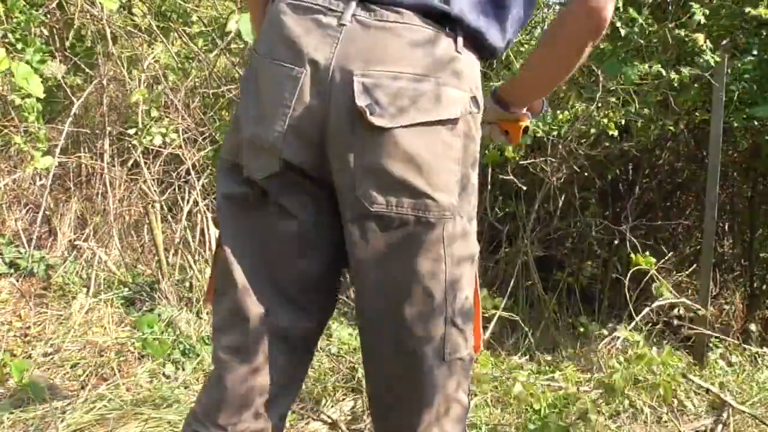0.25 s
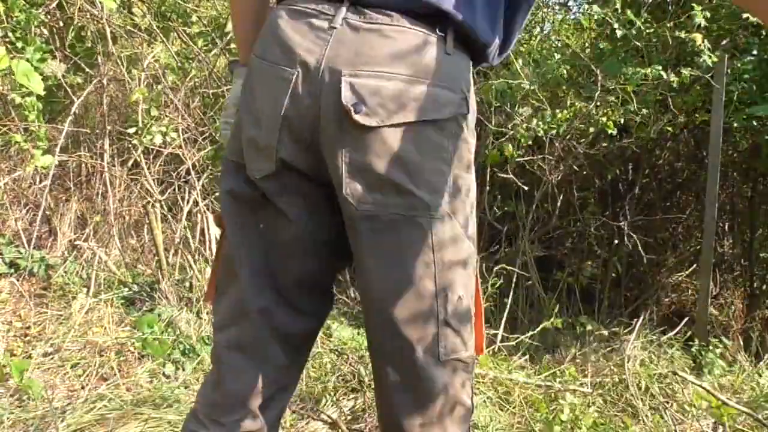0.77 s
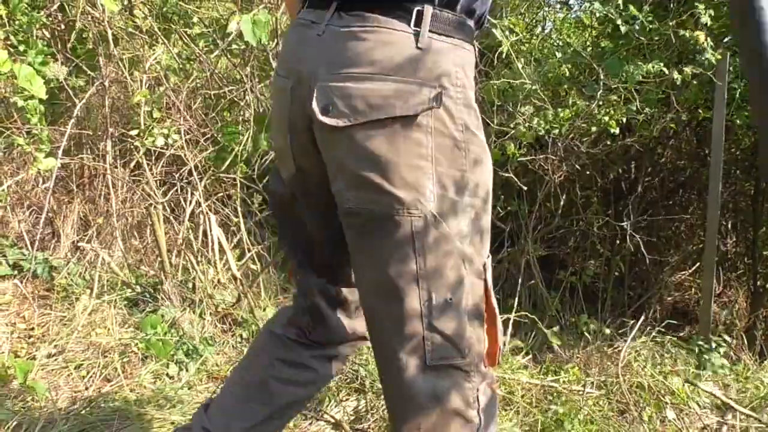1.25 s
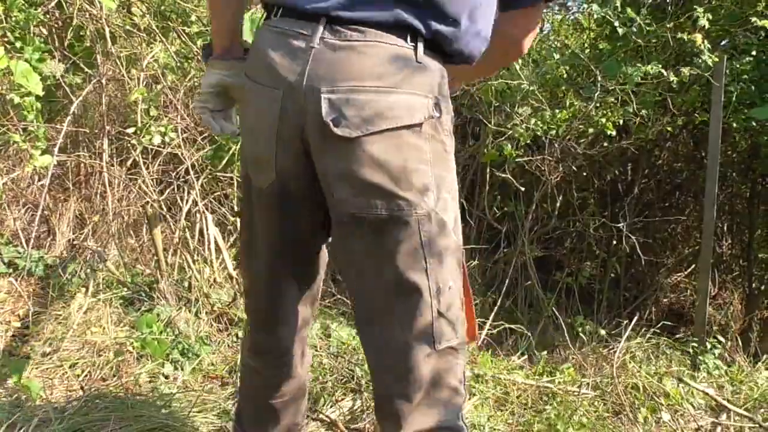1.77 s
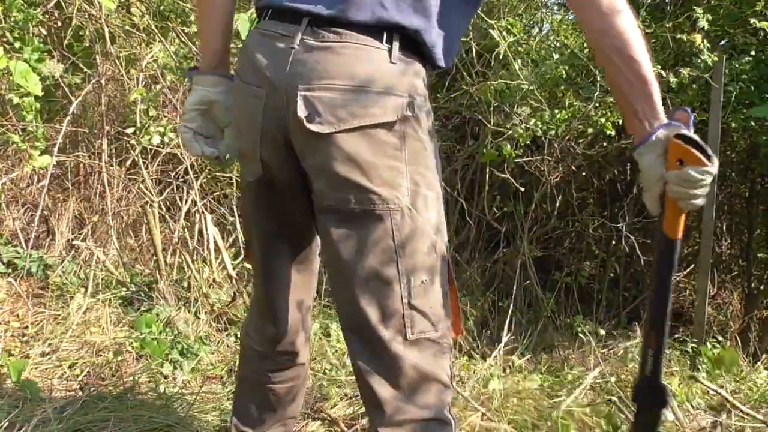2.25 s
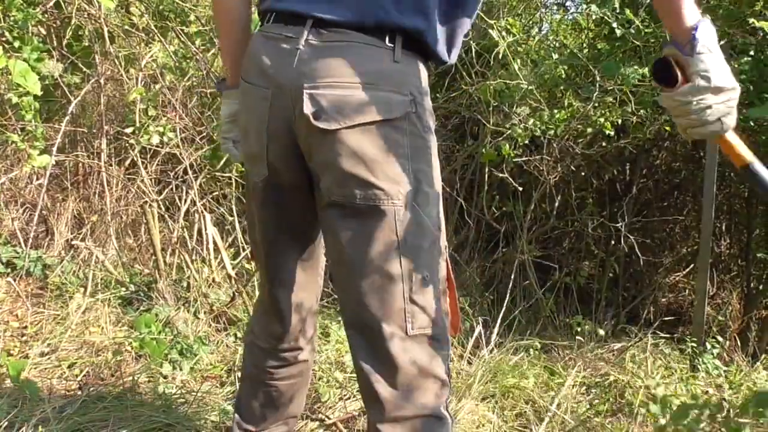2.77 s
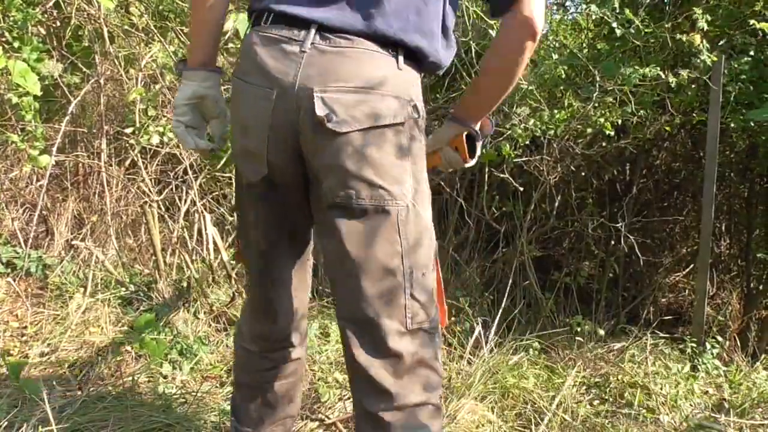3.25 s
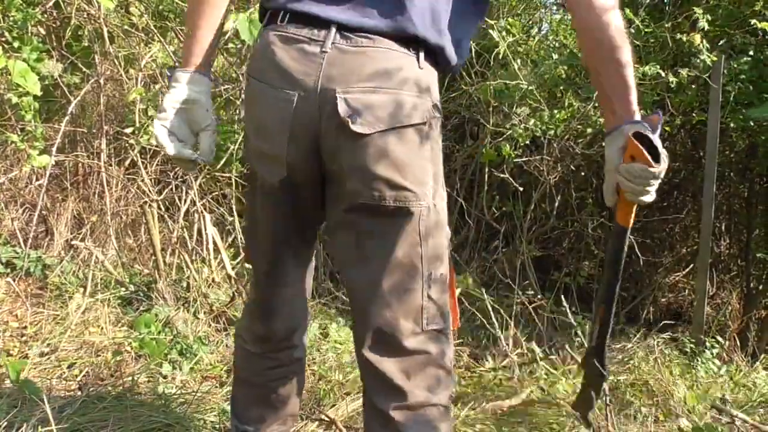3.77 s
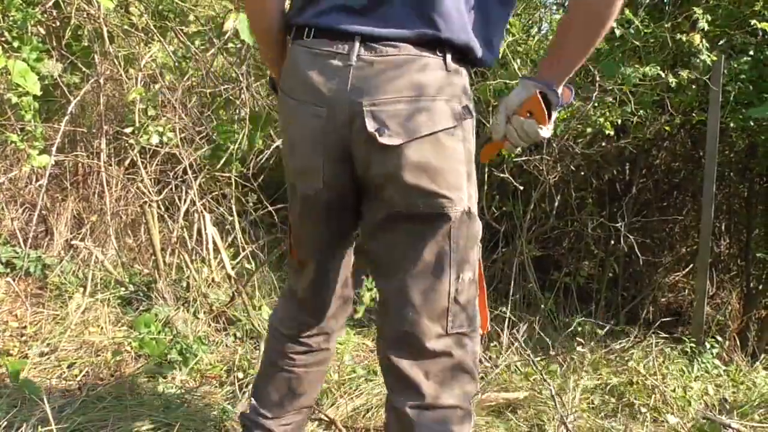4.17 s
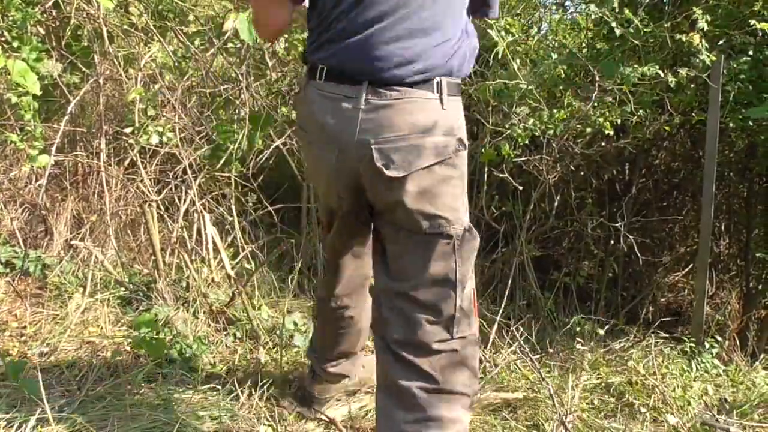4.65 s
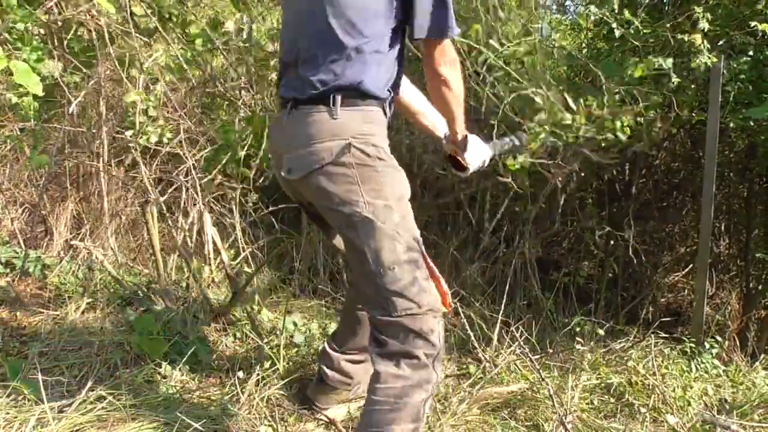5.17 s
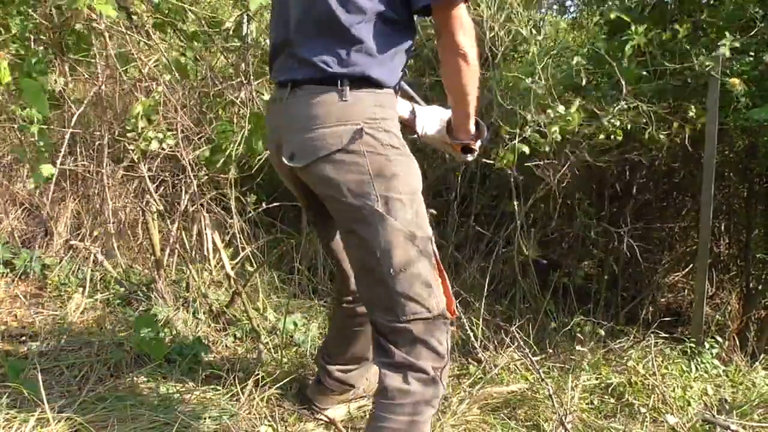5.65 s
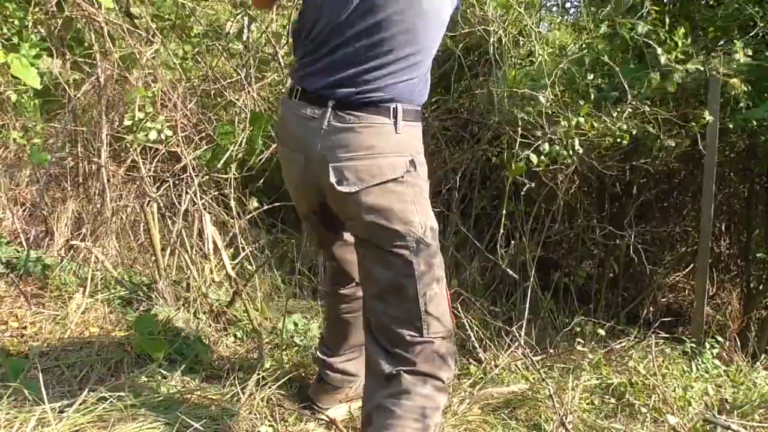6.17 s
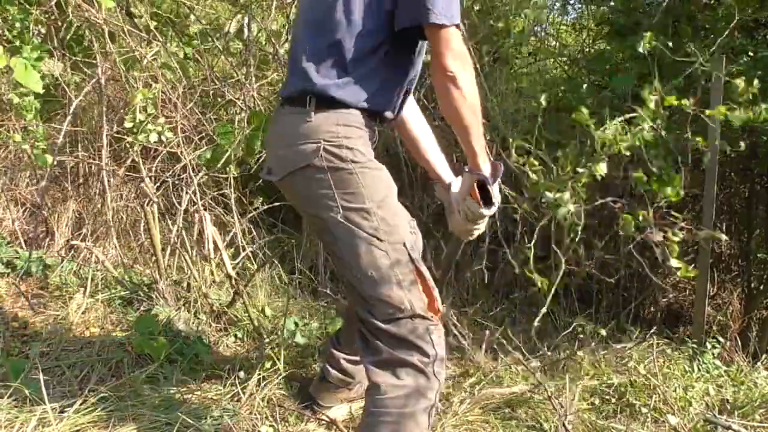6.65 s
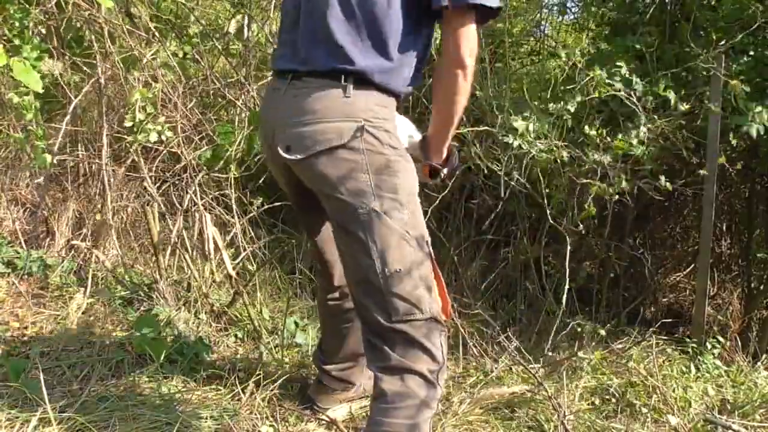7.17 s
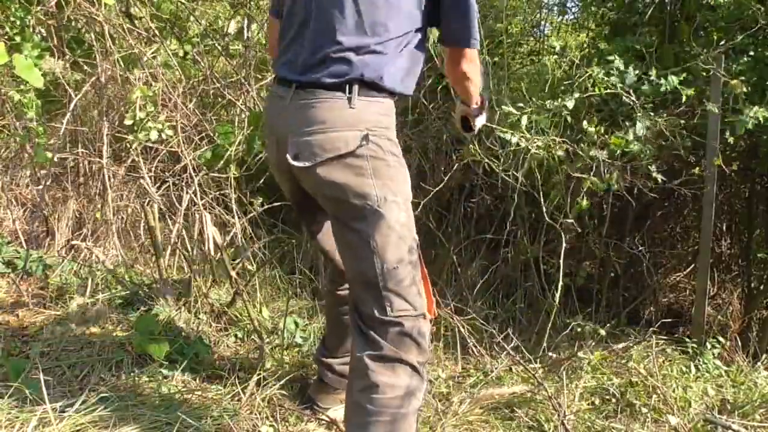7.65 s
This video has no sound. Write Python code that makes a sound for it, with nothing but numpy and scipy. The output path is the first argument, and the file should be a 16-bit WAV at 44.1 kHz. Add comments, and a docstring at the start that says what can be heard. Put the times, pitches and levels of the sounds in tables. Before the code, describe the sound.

Close outdoor stereo sound of bramble clearing. Soft dry stirring, then a crackling slash; straw crunches underfoot; two further slashes follow with longer, fizzing leaf rustle and bright ticks. More steps lead into a heavy fourth chop, then a pause, a loud snapping fifth stroke with low knocks, and a small final one. Thin foliage hiss and a barely audible far engine lie beneath, with only a short, diffuse hedge tail.

```python
"""Dry leaves and twigs stir close to the microphone, in quiet open air with a faint engine far off.
A man treads in dry grass and slashes at a bramble thicket with a long brush hook, six strokes in all.
Each stroke cracks stems and sets off a crunch that dies as the canes settle; boots crush straw between.
Crunch is dense random noise grains, stems ring and splinter, leaves tick, and knocks and drags are low
resonances; filtered noise makes the air, two wavering sines the engine, and a short tail the hedge."""
import sys
import numpy as np
from scipy import signal
from scipy.fft import rfft, irfft
from scipy.io import wavfile
from scipy.ndimage import uniform_filter1d

SR = 44100
rng = np.random.default_rng(int(sys.argv[2]) if len(sys.argv) > 2 else 0)


def store_wav(level_fs):
    """Save 16-bit WAV to argv[1]."""
    pcm = np.round(np.clip(np.atleast_2d(level_fs), -1, 1) * 32767)
    wavfile.write(sys.argv[1], SR, pcm.T.astype(np.int16))


N = 348698  # length in samples

# Strokes of the hook in the thicket. Each row: start in seconds, shaken leaves in dB, breaking twigs in dB,
# crushed litter in dB (all before the layer trims), time the blade cuts in seconds, fade in dB per second,
# swaying canes in dB relative to the stroke, time they sway in seconds.
HOOK_STROKES = [(0.696, -27.5, -37.5, -39.5, 0.068, 74, -18.5, 0.57),
                (2.209, -27.5, -33.5, -38.5, 0.24, 100, -5.5, 0.82),
                (3.641, -26.5, -33, -39.6, 0.12, 61.5, -13, 0.78),
                (5.139, -27.5, -30.3, -34.5, 0.18, 64.0, -7.5, 0.59),
                (6.57, -27.5, -34, -37.5, 0.047, 49.5, -13, 0.79),
                (7.788, -39.5, -43.5, -44.5, 0.14, 66, -13.0, 0.8)]
# How each layer answers a stroke. Each holds: rise in seconds, sag while the blade cuts in dB per second
# (negative swells), share in the sway in dB, level at rest in dB before the layer trim.
LEAF_RESPONSE = (.015, -2, 1, -67)
TWIG_RESPONSE = (.004, 19.5, -2.5, -79)
LITTER_RESPONSE = (0.03, 25.5, -2.1, -68.5)
SWAY_FADE_DB_PER_S, SETTLE_DB_PER_S = 15, 57
# Boots press into the straw or pull free of it. Each row: time of the height in seconds, rise in seconds,
# fall in seconds, leaves in dB, twigs in dB, litter in dB (before the layer trims).
BOOT_STEPS = [(1.195, 0.49, 0.396, -46.5, -54.5, -63), (1.274, 0.021, 0.085, -43, -50, -44.5),
              (1.411, 0.13, 0.27, -44, -53.5, -50.5), (1.55, 0.06, 0.19, -44, -51, -53.5),
              (1.722, 0.013, 0.12, -40, -54.0, -51), (1.767, 0.14, 0.16, -36.5, -48, -49),
              (4.704, 0.15, 0.309, -37.6, -49.0, -47.1), (4.831, 0.11, 0.064, -27.5, -44.5, -46.5),
              (5.004, 0.13, 0.222, -45, -59.4, -58), (5.128, 0.011, 0.085, -36.5, -41, -47)]
# A cane is caught, tugged or springs back. Each row: time of the height in seconds, rise in seconds,
# fall in seconds, leaves in dB, twigs in dB, litter in dB (before the layer trims).
CANE_SHAKES = [(0.012, 0.17, 0.39, -44.5, -54, -61), (0.131, 0.011, 0.15, -50, -53, -59.7),
               (0.416, 0.359, 0.33, -53, -64, -64), (0.76, 0.029, 0.056, -20, -28, -35.5),
               (0.856, 0.011, 0.022, -34, -34.5, -36.5), (0.898, 0.082, 0.27, -50, -41, -45),
               (0.974, 0.031, 0.023, -42, -41, -45), (2.02, 0.42, 0.16, -48.5, -59, -62.5),
               (2.252, 0.029, 0.033, -36, -28.8, -39), (2.49, 0.009, 0.018, -32, -49, -50.3),
               (2.621, 0.19, 0.24, -33, -41, -45), (3.044, 0.26, 0.32, -58, -52, -53),
               (3.317, 0.021, 0.159, -53.5, -74, -57.5), (4.491, 0.47, 0.033, -46, -59, -63),
               (5.085, 0.091, 0.183, -41.5, -55.3, -55), (6.022, 0.71, 0.54, -49.5, -57, -60.5),
               (6.205, 0.079, 0.29, -47, -56.5, -58.5), (6.301, 0.025, 0.4, -45.5, -55.5, -61.5),
               (6.481, 0.025, 0.124, -48, -54, -55), (6.554, 0.077, 0.031, -44, -50, -56.0),
               (6.596, 0.022, 0.061, -20.5, -31, -31.5), (6.728, 0.11, 0.089, -25.5, -35.5, -39.8),
               (7.48, 0.15, 0.097, -51, -64, -72.2), (7.561, 0.0071, 0.046, -49, -53.7, -54.5),
               (7.872, 0.088, 0.13, -30.5, -37.5, -44)]
SWELL_DB = 20  # a step or shake climbs this far in its rise time and drops as far in its fall time

# Colours of the three kinds of grain. Each row: frequency in Hz, relative density in dB per Hz.
LEAF_COLOUR = [(3000, -34), (5500, -15.5), (6300, -10), (7200, -3.5), (8400, 0), (9200, 0.5), (10800, -4),
               (13000, -6), (15000, -12), (16000, -20)]
TWIG_COLOUR = [(700, -30.5), (1300, -1), (1750, -7.5), (2150, -2), (2700, -7), (3300, -2), (4100, -3),
               (5600, -5.5), (6800, -2.5), (8800, -3), (15000, -88)]
LITTER_COLOUR = [(25, -56), (50, -37), (75, -8.5), (140, -3.5), (250, 0), (380, 1.5), (600, 0), (900, 1),
                 (1250, -3.5), (1700, -12.5), (2300, -29), (4000, -76.5)]
# Sheen at the top of the leaves. Each row: time in seconds, gain of the top treble in dB.
TOP_TREBLE_GAIN = [(0, -1), (1.1, -2.5), (2.2, 0.5), (2.9, -1), (3.4, 1), (3.8, 0.5), (4.3, 0), (4.75, 3.5),
                   (5.3, 1), (6.1, 3), (7.2, -1), (7.85, 3.5)]
TOP_TREBLE_HZ = 10800

# Colour of the still air around the microphone. Each row: frequency in Hz, relative density in dB per Hz.
AIR_COLOUR = [(15, -32), (25, -38), (55, -8), (145, -3.5), (185, -7.5), (217, -7), (344, -6.5),
              (416, -14.5), (463, -11), (887, -10), (1040, -12), (1790, -23.5), (5570, -30), (8590, -17),
              (16000, -27)]
# Likeness of left and right in the air. Each row: frequency in Hz, shared part of the power from 0 to 1.
AIR_LIKENESS = [(60, 0.66), (1000, 0.01), (3000, 0.33), (8000, 0.4), (15000, 0)]
AIR_DB = -56
# The far engine, slowly sagging. Each row: time in seconds, mean firing rate in Hz,
# mean level of the fundamental in dB, mean level of the octave in dB.
FAR_ENGINE = [(0, 86.1, -80, -82), (2, 85.3, -69.5, -80.5), (4, 80.9, -67, -72), (5.5, 80.4, -69.5, -64.5),
              (7.9, 80.05, -67, -64.5)]

# Stems that break under blade or boot. Each row: start in seconds, level in dB before the layer trim,
# pitch in Hz, ring in cycles, splinters in dB relative to the ring.
STEM_SNAPS = [(0.1247, -24, 1290, 0.96, -12), (0.133, -25, 4850, 3.4, -25), (.6997, -23, 1320, 2.6, -9),
              (.7025, -17.5, 2200, 1.4, -8), (.7628, -19, 4200, 1.4, -5), (0.8958, -24.5, 1200, 2, -22),
              (1.269, -9.5, 7100, 2, -14), (1.2715, -24, 2870, 2.4, -20), (1.415, -35, 2380, 2.6, -11),
              (1.535, -35, 5170, 5, -7), (1.574, -34, 3300, 2, -5.5), (1.59, -36, 3800, 2, -7),
              (2.2092, -13.5, 4150, 5, -11), (2.2372, -19.5, 2170, 4, -10), (2.6422, -20, 1210, 1.8, -3.5),
              (2.6455, -20.5, 3770, 5.7, -5), (2.909, -31, 1150, 2.1, -2), (2.914, -30, 3040, 4, -4),
              (3.6395, -14.5, 3320, 3.7, -16), (3.6412, -15, 2170, 2, -5.5), (3.682, -18.5, 3080, 3.3, -5),
              (4.045, -42.5, 2400, 2, 4), (4.1543, -32, 930, 1.1, -12), (4.4775, -28, 7000, 2.9, -11),
              (5.1467, -16, 3880, 2, -4.5), (5.148, -16, 1520, 1.5, -3), (5.158, -11, 6400, 1.9, -17),
              (5.561, -34, 2520, 4, -3), (5.82, -35.5, 1340, 2.8, -6.5), (6.157, -39, 900, 1.4, -5),
              (6.478, -41, 3500, 1.6, -6), (6.5314, -24.5, 4400, 1.7, -14), (6.5767, -11, 3030, 2.6, -2),
              (6.581, -20, 2240, 2.6, -1), (6.6043, -8, 1280, 1.55, -4.5), (6.776, -31, 2680, 6, -21),
              (7.154, -39, 3500, 2, -2.5), (7.5612, -34, 2450, 2.5, -5), (7.816, -33, 2200, 2, 2),
              (7.868, -29, 1270, 1.7, 5)]
# The loudest single dry leaves and thorns. Each row: start in seconds, peak in dB before the layer trim,
# chatter in dB relative to the tick.
LEAF_FLICKS = [(.407, -31.5, -4), (.539, -36, -1), (.557, -36, 4), (.73, -17, 4), (0.8568, -12, -1),
               (1.269, -26, 0), (1.3803, -28, -2), (1.998, -28.5, -3), (2.0776, -27.5, -7),
               (2.140, -34, -2), (2.2575, -15, -8), (2.373, -10, -1), (2.449, -10.5, -3), (2.458, -13, -2),
               (2.4923, -7.5, -2), (2.619, -16, -1), (2.6422, -13.5, -1), (2.863, -25, -3),
               (2.8675, -22.5, 8), (2.976, -25, -4), (3.313, -34, 4), (3.368, -37, -7), (3.664, -12, 2),
               (3.751, -19, 4), (3.768, -11, -1), (3.795, -15, -5), (3.927, -16, -6), (3.963, -31, -3),
               (4.479, -23, -5), (4.722, -23, -4), (4.746, -15, -3), (4.833, -14, -12), (4.864, -10.5, -5),
               (4.9226, -25.5, -4), (4.961, -26.5, -15), (5.031, -26, 4), (5.087, -20, -11),
               (5.104, -23, -1), (5.125, -22, 7), (5.1463, -12, -5), (5.315, -14, 2), (5.604, -20, -1),
               (5.960, -29, 8), (6.138, -28, -3), (6.190, -21.5, 0), (6.583, -8.5, 9), (6.716, -11, 2.5),
               (6.735, -13, 8), (7.389, -30, -4), (7.562, -37, -1), (7.787, -26, -5)]
# Lesser flicks come by chance and follow the shaking of the leaves.
STRAY_PER_S, STRAY_OVER_LEAVES_DB, STRAY_SPREAD_DB, STRAY_CHATTER_DB = 9, 10, 3.5, -1
# Boot or blade drags over the soil. Each row: start in seconds, length in seconds,
# level in dB before the layer trim, centre in Hz, width in Hz.
SOIL_DRAGS = [(.745, 0.068, -45, 202, 180), (1.275, 0.095, -53, 266, 70), (1.384, 0.086, -48.5, 247, 70),
              (1.532, 0.2, -57, 260, 90), (1.708, 0.096, -49, 322, 200), (2.803, 0.11, -55, 260, 70),
              (5.161, 0.19, -43, 302, 170), (6.575, 0.088, -42.5, 267, 220)]
# Dull knocks of heels and thick canes on the ground. Each row: start in seconds,
# level in dB before the layer trim, pitch in Hz.
GROUND_KNOCKS = [(.762, -23.5, 190), (1.394, -29, 249), (1.396, -25.5, 724), (1.406, -35, 290),
                 (1.414, -29, 520), (1.718, -30.5, 453), (1.791, -42, 504), (1.82, -21, 596),
                 (2.6419, -19.5, 447), (3.6398, -20, 452), (4.693, -32, 566), (4.773, -35, 496),
                 (4.834, -27.5, 470), (4.857, -30, 517), (4.94, -34, 425), (4.988, -34, 474),
                 (5.0032, -23, 730), (5.121, -28, 460), (5.1472, -18, 330), (6.017, -35.5, 505),
                 (6.605, -18, 525), (6.7031, -23.5, 486), (6.913, -22.5, 430), (6.973, -31, 298),
                 (7.868, -28, 350)]

# Timing of the two microphone ports. Each row: frequency in Hz, radians by which left leads.
PORT_PHASE = [(60, 0), (600, -.08), (2300, -.05), (4400, -.2), (6500, -.2), (8700, -.7), (10400, -2),
              (11800, .3), (15800, -.5)]
# Balance of the two microphone ports. Each row: frequency in Hz, left minus right in dB.
PORT_BALANCE = [(60, 0), (110, 0), (200, -0.5), (380, 0), (700, -2.5), (1290, -2.5), (2380, 0),
                (4400, -1.5), (8120, 0.5), (15000, -2)]
EDGE_HZ = 15850  # upper band limit of the microphone


def amp(db):
    """Decibels to gain."""
    return 10 ** (np.asarray(db) / 20)


def evened(x):
    """Scales to rms 1."""
    return x / np.sqrt(np.mean(x ** 2) + 1e-20)


def read(points, hz):
    """Reads a table on a log-frequency axis."""
    f, value = np.transpose(points)
    return np.interp(np.log(hz + 1), np.log(f + 1), value)


def add(mix, s, sound):
    """Adds a stereo sound to the mix at time s."""
    part = mix[:, max(round(s * SR), 0):][:, :sound.shape[1]]
    part += sound[:, :part.shape[1]]


def coloured(x, spectrum, size=4096):
    """Minimum-phase filter with the given spectrum, so that clicks keep sharp fronts."""
    hz = abs(np.fft.fftfreq(size, 1 / SR))
    log_gain = np.log(amp(np.maximum(read(spectrum, hz), -100)))
    response = np.exp(np.conj(signal.hilbert(log_gain)))
    taps = np.fft.ifft(response).real[:size // 2]
    return signal.oaconvolve(x, taps[None], axes=1)[:, :x.shape[1]]


def pair(same, size):
    """Left and right white noise that share a part of their power."""
    shared, *own = rng.standard_normal((3, size))
    same = np.clip(same, 0, 1)
    return np.sqrt(same) * shared + np.sqrt(1 - same) * np.array(own)


def burst(decay_s, same, size=1024):
    """One tiny fracture: a sharp front and a ragged, fast decay, with energy 1."""
    grain = pair(same, size) * np.exp(-np.arange(size) / SR / decay_s)
    return grain / np.linalg.norm(grain)


def stroke(t, rise_s, sag_db_per_s, share_db, cut_s, fade_db_per_s, sway_db, sway_s):
    """Power of one stroke: the blade bites, cuts and leaves; the canes sway on more softly, then settle."""
    t = np.maximum(t, 0)
    cut_db = -sag_db_per_s * np.minimum(t, cut_s) - fade_db_per_s * np.maximum(t - cut_s, 0)
    sway_db_now = sway_db + share_db - SWAY_FADE_DB_PER_S * t
    after_db = sway_db_now - SETTLE_DB_PER_S * np.maximum(t - sway_s, 0)
    bite = 1 - np.exp(-t / rise_s)
    return (bite * amp(np.maximum(cut_db, after_db))) ** 2


def swell(t, rise_s, fall_s):
    """Power of a step or shake: it builds up to time zero and dies away."""
    return amp(-SWELL_DB * np.maximum(-t / rise_s, t / fall_s)) ** 2


def agitation(layer, response, size=32):
    """Level in dB of one layer: strokes, steps and shakes add in power to its stirring at rest."""
    rise_s, sag_db_per_s, share_db, rest_db = response
    t = np.arange(0, N, size) / SR
    power = np.full(len(t), amp(rest_db) ** 2)
    for s, leaf_db, twig_db, litter_db, *timing in HOOK_STROKES:
        db = dict(leaf=leaf_db, twig=twig_db, litter=litter_db)[layer]
        power += amp(db) ** 2 * stroke(t - s, rise_s, sag_db_per_s, share_db, *timing)
    for s, rising_s, falling_s, leaf_db, twig_db, litter_db in list(BOOT_STEPS) + list(CANE_SHAKES):
        db = dict(leaf=leaf_db, twig=twig_db, litter=litter_db)[layer]
        power += amp(db) ** 2 * swell(t - s, rising_s, falling_s)
    return np.interp(np.arange(N) / SR, t, 10 * np.log10(power))


def mottled(x, patchy_db, size=128):
    """Fractures favour pitches of their own: random peaks some milliseconds long, about a kilohertz wide."""
    overlap = size * 3 // 4
    z = signal.stft(x, nperseg=size, noverlap=overlap)[2]
    patches = rng.standard_normal(z.shape[1:])
    patches = uniform_filter1d(patches, size=3, axis=0)  # over frequency
    patches = evened(uniform_filter1d(patches, size=7, axis=1))  # over time
    return signal.istft(z * amp(patchy_db * patches), nperseg=size, noverlap=overlap)[1][:, :N]


def crackle(level_db, spectrum, per_s, crowding, spread_db, decay_s, clump_db, patchy_db, same):
    """Tiny fractures at random moments, in clumps; harder shaking makes them both denser and larger."""
    rate = per_s * amp(crowding * (level_db - level_db.max()))  # per_s holds at the hardest shaking
    clumps = evened(signal.oaconvolve(rng.standard_normal(N), np.hanning(700), "same"))
    sizes = amp(spread_db * np.minimum(rng.exponential(1, N), 6) + clump_db * clumps)
    energy = sizes ** 2 * (rng.random(N) < rate / SR)
    # every fracture is a noise burst with a sharp front and an exponential decay
    decaying = signal.lfilter([1], [1, -np.exp(-2 / (decay_s * SR))], energy)
    envelope = np.sqrt(decaying + 1e-9)
    grains = coloured(mottled(envelope * pair(same, N), patchy_db), spectrum)
    # even out the slow power so that the shaking alone sets the level
    power = abs(uniform_filter1d((grains ** 2).mean(0), size=3000))
    return amp(level_db) * grains / np.sqrt(power + power.mean() * 1e-4)


def top_treble(x):
    """The sheen at the top of the leaves' fizz rises and falls slowly."""
    high_pass = signal.butter(3, TOP_TREBLE_HZ, "high", fs=SR, output="sos")
    top = signal.sosfiltfilt(high_pass, x)
    gain_db = np.interp(np.arange(N) / SR, *np.transpose(TOP_TREBLE_GAIN))
    return x + (amp(gain_db) - 1) * top


def thicket():
    """Leaves fizz, twigs crackle and the litter below crunches as the brambles are hit and trodden."""
    leaf_db = agitation("leaf", LEAF_RESPONSE)
    twig_db = agitation("twig", TWIG_RESPONSE)
    litter_db = agitation("litter", LITTER_RESPONSE)
    leaves = crackle(leaf_db, LEAF_COLOUR, per_s=16000, crowding=0.22, spread_db=2.5,
                     decay_s=0.00034, clump_db=1.26, patchy_db=1.5, same=0.48)
    twigs = crackle(twig_db, TWIG_COLOUR, per_s=4200, crowding=0.12, spread_db=2.5,
                    decay_s=0.0037, clump_db=-0.4, patchy_db=2.0, same=0.79)
    litter = crackle(litter_db, LITTER_COLOUR, per_s=4000, crowding=0.17, spread_db=2.5,
                     decay_s=0.0017, clump_db=0.5, patchy_db=1.5, same=0.89)
    return amp(-0.5) * top_treble(leaves) + amp(-0.54) * twigs + amp(-1.0) * litter


def scatter(x, t60=0.18, size=12000):
    """The hedge and the ground throw back a short, diffuse tail."""
    t = np.arange(size) / SR
    tail = pair(0.28, size) * amp(-60 * t / t60) * (t > 0.003)  # nothing returns in the first 3 ms
    return signal.oaconvolve(x, tail / np.linalg.norm(tail[0]), axes=1)[:, :N]


def air():
    """Quiet outdoor wash about the microphone: a low far murmur and a thin hiss of foliage."""
    hz = np.fft.rfftfreq(N, 1 / SR)
    shared, *own = rfft(rng.standard_normal((3, N)))
    same = np.clip(read(AIR_LIKENESS, hz), 0, 1)
    spectra = np.sqrt(same) * shared + np.sqrt(1 - same) * np.array(own)
    wash = irfft(spectra * amp(read(AIR_COLOUR, hz)), N)
    return amp(AIR_DB) * evened(wash)


def wander(t):
    """Slow, irregular wavering with rms 1: sixteen sines from 0.4 to 6 Hz in random phase."""
    return evened(sum(np.sin(2 * np.pi * (f * t + rng.random())) for f in np.geomspace(0.4, 6, num=16)))


def engine():
    """Only the two lowest lines of a far engine carry, wavering on the way."""
    t = np.arange(N) / SR
    s, *columns = np.transpose(FAR_ENGINE)
    hz, low_db, octave_db = (np.interp(t, s, column) for column in columns)
    drift, fade = wander(t), wander(t)
    turn = 2 * np.pi * np.cumsum(hz * (1 + 0.006 * drift)) / SR
    lines = amp(low_db) * np.sin(turn) + amp(octave_db) * np.sin(2 * turn)
    return np.sqrt(2) * amp(1.2 * fade) * lines  # root 2: the line levels are rms


def snaps(size=2048):
    """A stem parts with a few cycles of ringing, and its fibres splinter."""
    out, t = np.zeros((2, N)), np.arange(size) / SR
    fibre_colour = [(40, -29), (150, -17), (600, 1), (3500, -1.0), (6000, -9), (15000, -15)]  # Hz, dB
    for s, db, hz, cycles, splinter_db in STEM_SNAPS:
        onset = 1 - np.exp(-t * hz / 0.21)
        ring = np.sin(2 * np.pi * hz * t) * np.exp(-t * hz / max(cycles, 0.5)) * onset
        fibres = pair(0.85, size) * rng.exponential(1, size) * np.exp(-t / 0.0052)
        fibres = coloured(fibres, fibre_colour)
        add(out, s, amp(db) * (ring + amp(splinter_db) * fibres))
    return amp(-2.5) * out


def stray_flicks(count=200):
    """Chance flicks at random moments, louder where the leaves are shaken harder."""
    leaf_db = agitation("leaf", LEAF_RESPONSE)
    times = np.cumsum(rng.exponential(1, count)) / STRAY_PER_S
    spreads = rng.standard_normal(count)
    return [(s, leaf_db[int(s * SR)] + STRAY_OVER_LEAVES_DB + STRAY_SPREAD_DB * z, STRAY_CHATTER_DB)
            for s, z in zip(times, spreads) if s < N / SR]


def flicks():
    """A dry leaf ticks brightly and chatters for a few milliseconds."""
    out = np.zeros((2, N))
    colour = [(100, -32), (800, -24), (5500, -8), (8000, 10.5), (11000, 8.5), (15500, -7.5)]  # Hz, dB
    for s, db, chatter_db in list(LEAF_FLICKS) + stray_flicks():
        tick = burst(0.00037, 0.67) + amp(chatter_db) * burst(0.0028, 0.83)
        tick = coloured(tick, colour)
        add(out, s, amp(db) * tick / abs(tick).max())
    return amp(0.5) * out


def drags():
    """Packed soil answers a dragging boot or blade with a hollow rumble that swells fast and fades."""
    out = np.zeros((2, N))
    for s, length_s, db, hz, width_hz in SOIL_DRAGS:
        u = np.linspace(0, 1, round(length_s * SR))
        body = signal.iirpeak(hz, hz / width_hz, fs=SR)
        rubbing = pair(0.91, SR)[:, :len(u)]
        rumble = signal.lfilter(*body, signal.lfilter(*body, rubbing))
        add(out, s, amp(db) * evened(rumble * np.sin(np.pi * np.sqrt(u))))
    return amp(-3.5) * out


def knocks(size=2048):
    """A blow starts with a click; soft ground damps it within a cycle or two and a little grit scatters."""
    out, t = np.zeros((2, N)), np.arange(size) / SR
    grit_colour = [(40, -32), (150, -28), (500, -18), (1300, -8.0), (3000, -19), (12000, -21)]  # Hz, dB
    for s, db, hz in GROUND_KNOCKS:
        push = np.sin(2 * np.pi * hz * t - 0.4) * np.exp(-t * hz / 0.85)
        # a small body radiates no deep bass
        push = signal.lfilter(*signal.butter(2, hz / 3, "high", fs=SR), push)
        grit = coloured(burst(0.0015, 1.0, size), grit_colour)
        add(out, s, amp(db) * (push + amp(17) * grit))
    return amp(-1.5) * out


def scene():
    """Rustle and cracks in front of the hedge, over the quiet background."""
    rustle = thicket() + drags()
    cracks = snaps() + flicks() + knocks()
    hedge = scatter(amp(-11.5) * rustle + amp(-14.5) * cracks)
    return rustle + cracks + hedge + air() + engine()


def record(dry):
    """The microphone's two ports differ in phase and level along the spectrum; then its band limit."""
    hz = np.fft.rfftfreq(N, 1 / SR)
    # each port takes half of the difference, in opposite directions
    half = amp(read(PORT_BALANCE, hz) / 2) * np.exp(1j * read(PORT_PHASE, hz) / 2)
    heard = irfft(rfft(dry) * np.array([half, 1 / half]), N)
    low_pass = signal.firwin(401, EDGE_HZ, window=("kaiser", 9), fs=SR)
    return signal.oaconvolve(heard, low_pass[None], "same")


dry = scene()
out = record(dry)
store_wav(out)
```